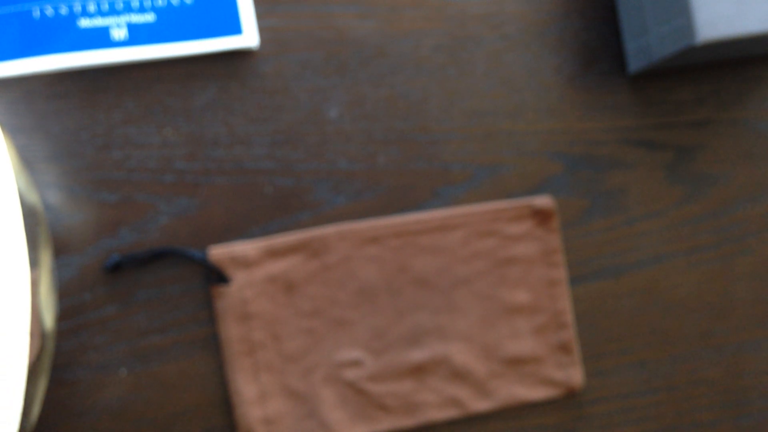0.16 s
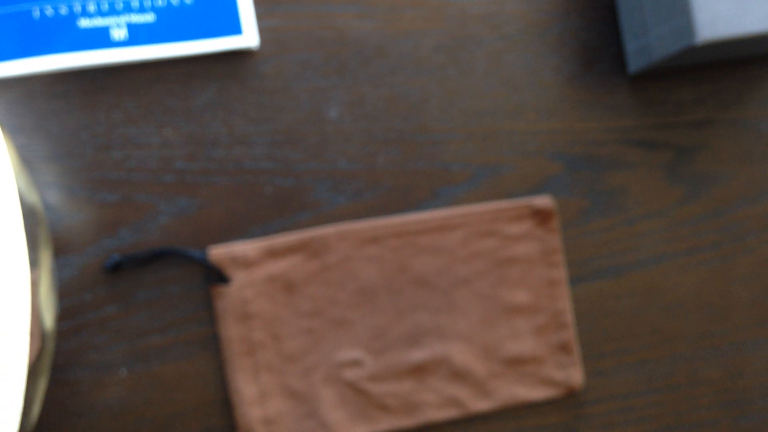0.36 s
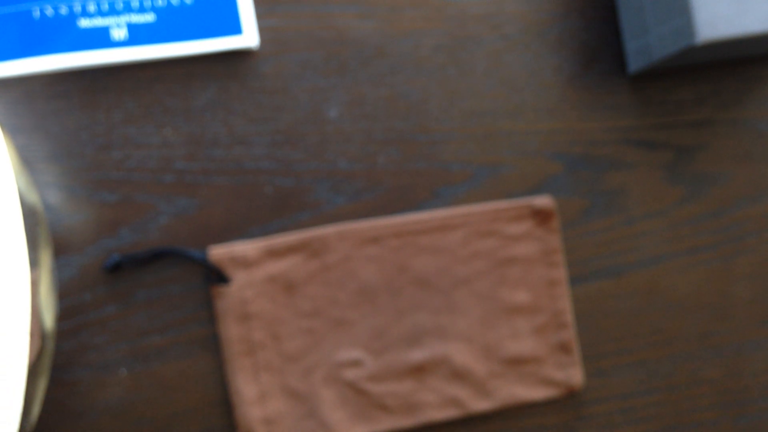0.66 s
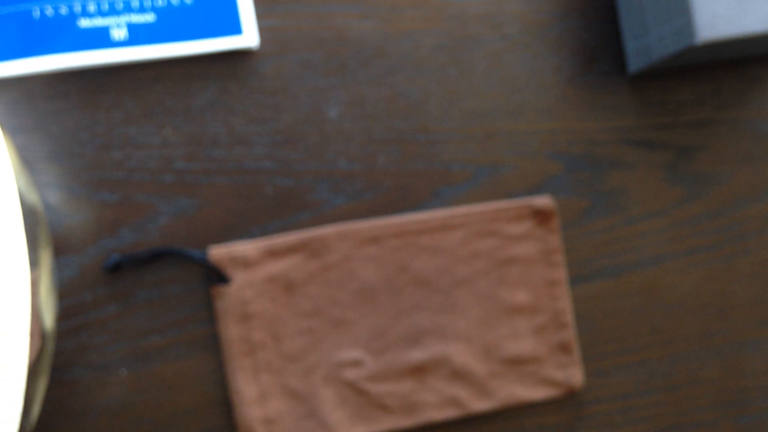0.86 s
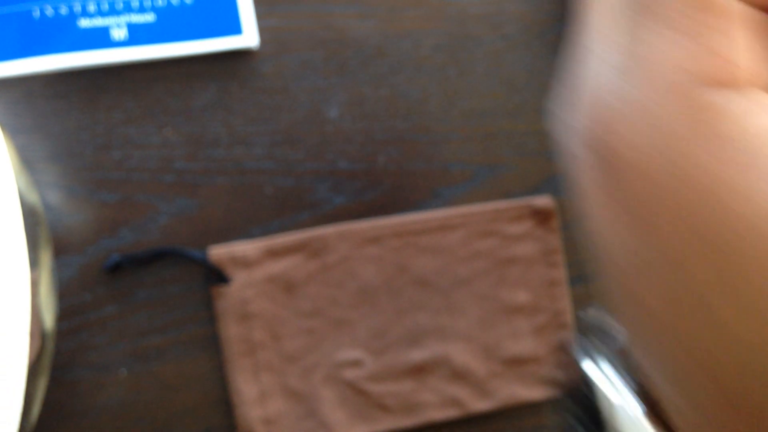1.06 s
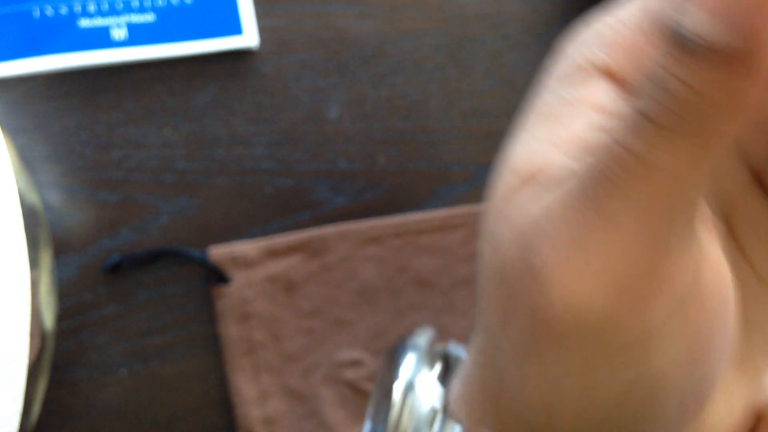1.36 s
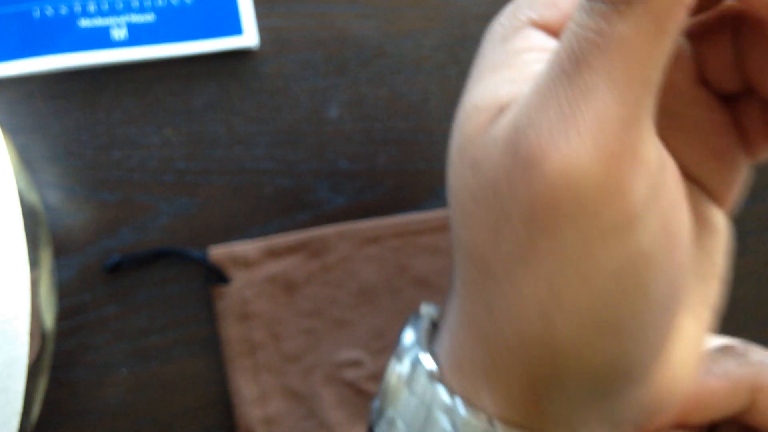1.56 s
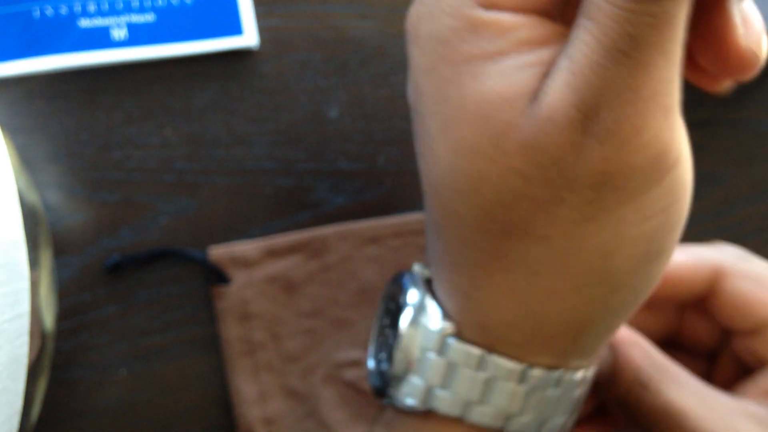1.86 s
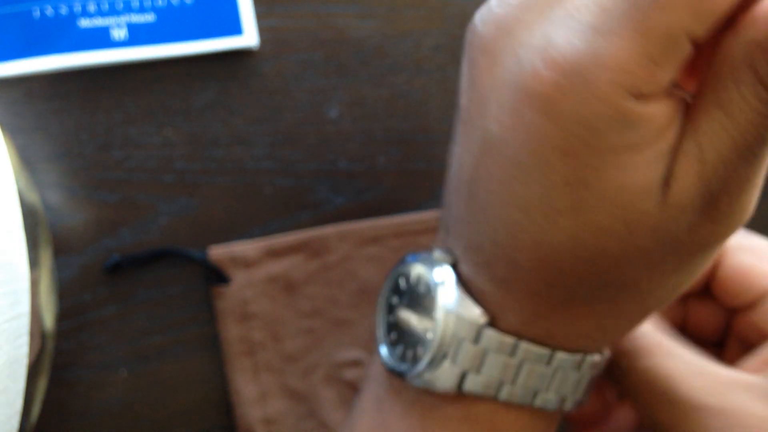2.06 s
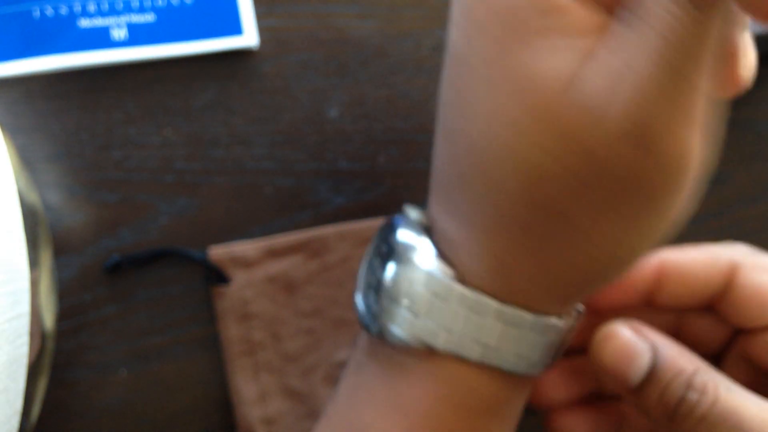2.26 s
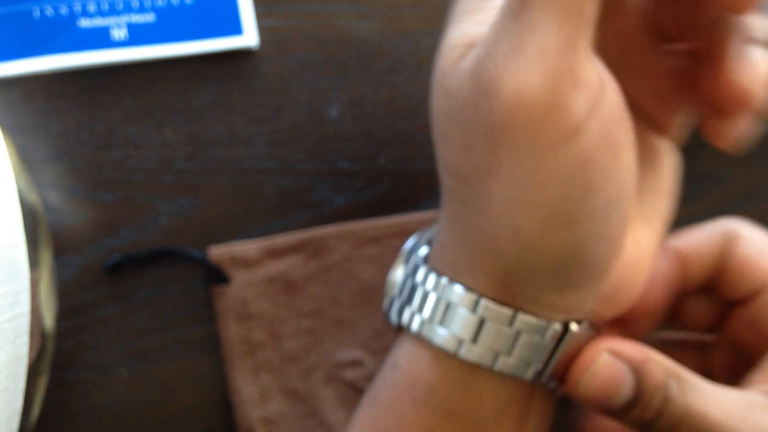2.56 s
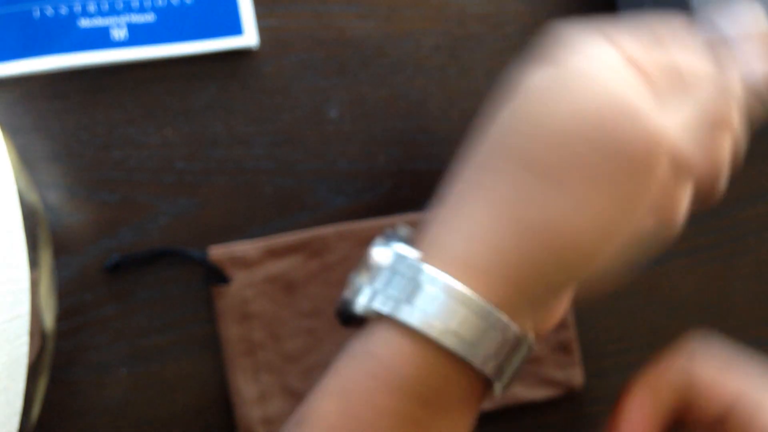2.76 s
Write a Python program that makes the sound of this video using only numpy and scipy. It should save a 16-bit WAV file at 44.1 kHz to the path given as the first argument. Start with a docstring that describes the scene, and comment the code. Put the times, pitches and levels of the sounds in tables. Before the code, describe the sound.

Close up in a quiet room, small steel links rattle and rub softly, a few sharp clicks come as the clasp folds, and a bright hard snap locks it, over faint hum and hiss.

```python
"""Watch bracelet pulled onto a wrist

A steel bracelet is handled above a desk in a quiet room, close to the microphone.
Links tick as brief damped resonances and slide over the skin as shaped noise with tiny touches.
The clasp folds and snaps shut, striking many resonances at once, and its plate rings on in beating modes.
Ticks and snap return off the desk top and near surfaces and die in the room.
Filtered noise below makes hum, hiss, a swelling low tone and a distant swelling rumble."""
import sys
import numpy as np
from scipy import signal
from scipy.fft import rfft, irfft
from scipy.io import wavfile

SR = 44100
rng = np.random.default_rng(int(sys.argv[2]) if len(sys.argv) > 2 else 0)


def store_wav(level_fs):
    """Save 16-bit WAV to argv[1]."""
    pcm = np.round(np.clip(np.atleast_2d(level_fs), -1, 1) * 32767)
    wavfile.write(sys.argv[1], SR, pcm.T.astype(np.int16))


def rack_gain(trim_db):
    """Turn a fader trim in dB into the linear factor to multiply a signal by."""
    fader = np.asarray(trim_db, float)
    return 10 ** (fader / 20)


N = 127890  # length in samples

# the clasp locks: t/s, peak level before reflections/dB
CLASP_LOCK = [(2.5966, -7)]


def in_time(rows):
    """Level envelope: decibels interpolated linearly in time become a gain per sample."""
    s, db = np.transpose(rows)
    return rack_gain(np.interp(np.arange(N) / SR, s, db))


def rms_one(x):
    """Normalisation of mean power: the signal is scaled to rms 1."""
    return x / np.sqrt(np.mean(x ** 2) + 1e-20)


def coloured(spectrum, size):
    """Spectral shaping: white noise is weighted over log frequency, then scaled to rms 1."""
    hz, db = np.transpose(spectrum)
    grid = np.fft.rfftfreq(size, 1 / SR) + 1  # offset avoids log(0)
    gain = rack_gain(np.interp(np.log(grid), np.log(hz), db))
    noise = rng.standard_normal(size)
    return rms_one(irfft(rfft(noise) * gain, size))


def ring(clicks, hz, t60):
    """Damped oscillator: a unit click starts a decaying sine of initial height 1."""
    r = rack_gain(-60 / (t60 * SR))
    w = 2 * np.pi * hz / SR
    return signal.lfilter([0, np.sin(w)], [1, -2 * r * np.cos(w), r * r], clicks + 1e-18)


def band(hz, width):
    """Resonance driven by noise: bandwidth is inverse to decay time; the result has rms 1."""
    t60 = np.log(1000) / (np.pi * width)
    return rms_one(ring(rng.standard_normal(N), hz, t60))


def contact(size=700):
    """Repeated impact: one sharp touch, then smaller random touches as neighbouring links rattle on."""
    chatter_s, chatter_db, chatter_share = 0.003, -16, 0.12  # decay constant, level, share of samples
    t = np.arange(size) / SR
    draw = rng.random((size, 2))
    touched = draw[:, 0] < chatter_share
    train = rack_gain(chatter_db) * np.exp(-t / chatter_s) * touched * (4 * draw[:, 1] - 2)
    train[0] = 1
    return train


def clink(touch, hz, width):
    """Cascaded resonance: two passes give a soft rise and steep skirts, scaled to peak 1."""
    r = np.exp(-np.pi * width / SR)
    for _ in range(2):
        touch = signal.lfilter([1, 0, -1], [1, -2 * r * np.cos(2 * np.pi * hz / SR), r * r], touch)
    return touch / (np.abs(touch).max() + 1e-20)


def add(out, s, sound):
    """Superposition: a sound is mixed in from time s in seconds."""
    start = int(s * SR)
    out[start:start + len(sound)] += sound


def room(x, tail_db):
    """Room impulse response: direct sound, early reflections, diffuse tail decaying band by band."""
    # desk top, then two near surfaces: delay t/s, level/dB
    echoes = [(.0019, -7.5), (.011, -19.5), (0.0153, -25)]
    # reverberant decay by band: f/Hz, T60/s, relative level/dB
    decay = [(487, 0.54, -1), (2000, 0.17, 5.5), (4650, 0.28, 4.5), (7000, 0.1, -6.5), (12400, 0.21, 1),
             (14500, 0.086, 3.5)]
    gap_s = 0.0075  # the tail fades in over this time
    t = np.arange(SR // 2) / SR
    hz, t60, level_db = np.transpose(decay)
    edges = np.r_[100, np.sqrt(hz[1:] * hz[:-1]), 19000]  # Hz
    tail = np.zeros(len(t))
    for low, high, fall, db in zip(edges, edges[1:], t60, level_db):
        sos = signal.butter(2, [low, high], "band", fs=SR, output="sos")
        noise = signal.sosfilt(sos, rng.standard_normal(len(t)))
        tail += noise * rack_gain(db - 60 * t / fall)
    tail *= np.clip(t / gap_s, 0, 1) ** 2
    response = rack_gain(tail_db) * tail / np.sqrt(np.sum(tail ** 2))  # tail energy re direct sound
    response[0] += 1
    for lag, db in echoes:
        response[int(lag * SR)] += rack_gain(db)
    return signal.fftconvolve(x, response)[:N]


def background():
    """Stationary noise and narrow resonances: room air, wavering hum and a low swelling tone."""
    # room air spectrum: f/Hz, relative level per Hz/dB
    air_colour = [(15, -61.5), (28, -34), (50, -5.5), (108, 6.5), (277, -8), (400, -13), (800, -17.5),
                  (3000, -26.5), (11900, -22.5), (14800, -21), (16000, -60)]
    # wavering hum: f/Hz, width/Hz, level/dB
    hum_bands = [(62, 11, -74.5), (103.2, 5.3, -74)]
    # swell of the low tone: t/s, level/dB
    drone_swell = [(0, -83), (1.55, -87), (1.7, -74.5), (2.05, -71.5), (2.15, -89.5), (2.9, -91)]
    air = rack_gain(-74) * coloured(air_colour, N)
    hum = sum(rack_gain(db) * band(hz, width) for hz, width, db in hum_bands)
    drone = in_time(drone_swell) * band(215.2, 7.5)  # Hz, width in Hz
    return air + hum + drone


def rumble():
    """Amplitude-modulated noise: a broad distant spectrum with faint resonances swells slowly."""
    # swell of the broad noise: t/s, level/dB
    swell = [(0, -75), (.15, -68.5), (.45, -69.5), (.58, -70), (.7, -68.5), (.82, -71), (.9, -75),
             (1.55, -76), (1.72, -71), (2.05, -75.5), (2.15, -76.5), (2.75, -77), (2.9, -75.5)]
    # spectrum: f/Hz, relative level per Hz/dB
    colour = [(88, -24), (150, 0), (431, -1.5), (862, -7), (1130, -7.5), (1460, -8), (2160, -8),
              (2590, -10), (2830, -10.5), (3500, -12), (5500, -15), (7150, -40)]
    # resonances: f/Hz, width/Hz, level re broad noise/dB
    peaks = [(43.8, 36, -9.5), (298, 22, -8), (2140, 220, -14.5), (2810, 74, -11.5), (4070, 170, -15)]
    resonances = sum(rack_gain(db) * band(hz, width) for hz, width, db in peaks)
    return in_time(swell) * (coloured(colour, N) + resonances)


def slide():
    """Friction noise: smooth rubbing hiss plus tiny link touches whose rate follows the rubbing."""
    # bracelet rubbing on skin: t/s, hiss level/dB
    rubbing = [(0, -76.5), (.17, -74.5), (.24, -68), (.30, -73), (.6, -81), (.66, -74), (.73, -79),
               (.8, -69.5), (.86, -80), (1.03, -66), (1.15, -71), (1.28, -77.5), (1.38, -71.5), (1.5, -80),
               (1.68, -76), (2.0, -88.5), (2.12, -74.5), (2.3, -77.5), (2.9, -86)]
    # hiss spectrum: f/Hz, relative level per Hz/dB
    colour = [(1760, -31), (3000, -9), (7000, 4.5), (10100, -1.5), (12300, -1.5), (15200, 2),
              (15700, -13.5)]
    grains_per_s, grain_db = 700, -4.5  # mean rate; level re hiss
    spread_db, grain_width_hz = 6, 3000
    level = in_time(rubbing)
    sizes = rack_gain(spread_db * np.minimum(rng.exponential(1, N), 4)) * rng.choice([-1, 1], N)
    born = rng.random(N) < grains_per_s * level / level.mean() / SR
    dealt = rng.integers(0, 8, N)  # which of eight pitches each touch excites
    grains = np.zeros(N)
    for k, hz in enumerate(np.geomspace(5500, 14000, 8)):
        touches = sizes * born * (dealt == k) + 1e-18
        grains += rms_one(clink(touches, hz, grain_width_hz))
    return level * (coloured(colour, N) + rack_gain(grain_db) * rms_one(grains))


def plate(count=10):
    """Beating of close modes: after the snap the clasp plate rings on in clusters of damped sines."""
    # mode clusters: f/Hz, level before each mode's random weight/dB, T60/s
    clusters = [(4950, -60, 0.52), (7500, -60.5, .15), (11800, -64, 0.13)]
    spread_hz = 190  # largest upward offset of a mode
    hit = np.zeros(N)
    hit[int(CLASP_LOCK[0][0] * SR)] = 1
    out = np.zeros(N)
    for hz, db, t60 in clusters:
        for offset, size in rng.uniform(-0.87, 1, (count, 2)):
            out += rack_gain(db) * size * ring(hit, hz + spread_hz * offset, t60)
    return out


def ticks():
    """Impact excitation: each contact rings a link briefly with a bright edge; dull knocks sound lower, one as
    the clasp folds."""
    # contacts of links and folding clasp: t/s, main ring level/dB, main ring f/Hz, ring width/Hz,
    # bright edge level/dB
    contacts = [(0.01, -57, 5200, 2000, -49.5), (0.0912, -50, 7250, 1500, -47.5),
                (.1217, -48.5, 7100, 1850, -45), (0.2316, -41, 7900, 2500, -45),
                (0.246, -43.5, 7100, 2500, -48), (0.3294, -33.5, 6310, 1230, -31),
                (0.3777, -52.5, 6500, 1000, -61), (0.5398, -40, 5730, 1180, -39.5),
                (.5722, -38, 5100, 3330, -68), (0.6434, -49.5, 5800, 2510, -37),
                (0.6668, -49, 6000, 2500, -39.5), (0.7843, -51, 7360, 3000, -45),
                (.8072, -51.5, 4700, 3020, -47.5), (.8880, -56, 6300, 2500, -42),
                (0.922, -54, 6260, 2500, -44), (0.949, -58, 6360, 2500, -49.5),
                (0.9961, -46.5, 5700, 2500, -42.5), (1.056, -48, 7300, 3000, -43),
                (1.089, -49, 8050, 2470, -46), (1.2122, -45, 8440, 3020, -41),
                (1.257, -50.5, 6660, 3000, -49), (1.551, -48.5, 6900, 3000, -42),
                (1.6682, -61, 6200, 2500, -53.5), (1.705, -50, 6400, 3000, -46),
                (1.7820, -41.5, 6230, 1130, -54), (1.8692, -23.5, 6880, 1830, -60),
                (1.87, -32.5, 5270, 650, -35), (1.9318, -58, 6000, 2500, -66),
                (1.962, -55, 5840, 2500, -61), (1.9717, -37.5, 6060, 1680, -42.5),
                (2.014, -54, 8100, 1500, -65), (2.1145, -54.5, 7100, 2450, -50.5),
                (2.208, -52, 8000, 3000, -49), (2.2509, -26.5, 6300, 1840, -38),
                (2.2548, -17, 6870, 1400, -24), (2.4069, -48.5, 6100, 1470, -51),
                (2.5742, -56, 7000, 3550, -58.5), (2.5759, -36.5, 7330, 2480, -41.5),
                (2.5848, -42, 7500, 3000, -44), (2.5868, -30, 6240, 3026, -41.5),
                (2.7134, -40.5, 8260, 1410, -47)]
    # dull knocks, the last one as the clasp folds: t/s, level of each resonance/dB, lower f/Hz, lower width/Hz
    knocks = [(.5393, -52, 1380, 1360), (.5722, -40.5, 1300, 1350), (1.2549, -60, 1670, 1390),
              (1.869, -53.5, 1500, 1380), (2.029, -59, 960, 400), (2.154, -64, 896, 450),
              (2.208, -57.5, 1380, 1100), (2.2536, -42.5, 3700, 1500)]
    # small link resonances: f/Hz, width/Hz
    small_links = [(9800, 3300), (12000, 2200), (14500, 1650)]
    edge_spread_db = 4  # each contact favours other small links
    upper = 2.11  # pitch ratio of the second knock resonance
    out = np.zeros(N + SR)
    for s, db, hz, width, bright_db in contacts:
        touch = contact()
        edge = np.zeros(len(touch))
        for k, (edge_hz, edge_width) in enumerate(small_links):
            weight = rack_gain(edge_spread_db * rng.standard_normal())
            edge += (-1) ** k * weight * clink(touch, edge_hz, edge_width)
        edge /= np.abs(edge).max()
        add(out, s, rack_gain(db) * clink(touch, hz, width) - rack_gain(bright_db) * edge)
    for s, db, hz, width in knocks:
        touch = contact()
        knock = clink(touch, hz, width) - 0.97 * clink(touch, upper * hz, upper * width)
        add(out, s, rack_gain(db) * knock)
    return out[:N]


def snap():
    """Modal excitation: the lock strikes all clasp modes, neighbours in opposite phase, and rattles."""
    # clasp resonances: f/Hz, relative level/dB, width/Hz
    modes = [(221, -35, 240), (650, -34.5, 290), (1500, -22.5, 1200), (3560, -12, 1300), (4200, -10.5, 510),
             (4900, -5, 350), (5590, -17.5, 600), (6420, -2.5, 550), (7390, 0, 570), (8450, -2, 1020),
             (9980, -1, 780), (11600, -4, 870), (12610, -4, 750), (14270, 1, 2700)]
    (s, db), = CLASP_LOCK
    touch = contact(size=2000)
    body = np.zeros(len(touch))
    for k, (hz, level_db, width) in enumerate(modes):
        body += (-1) ** k * rack_gain(level_db) * clink(touch, hz, width)
    out = np.zeros(N)
    add(out, s, rack_gain(db) * body / np.abs(body).max())
    return out


def scene():
    """Superposition of sources: the bracelet in the room over the background."""
    links = room(ticks(), -16.5)  # tail dB: muffled by the hand, links reach the room less
    clasp = room(snap(), -12.5) + plate()
    return (links + clasp + slide() + rumble() + background())[None]


def band_limit(x):
    """A steep low-pass at the top of the band."""
    return signal.sosfilt(signal.butter(12, 16500, fs=SR, output="sos"), x)


def record(dry):
    """Band limiting: a steep low-pass removes the top and a high-pass the lowest bass."""
    low_pass = signal.cheby2(8, 35, 15900, fs=SR, output="sos")  # 35 dB down from 15900 Hz
    high_pass = signal.butter(2, 51, "high", fs=SR, output="sos")  # Hz
    cut = signal.sosfilt(high_pass, signal.sosfilt(low_pass, dry))
    return band_limit(cut)


dry = scene()
out = record(dry)
store_wav(out)
```